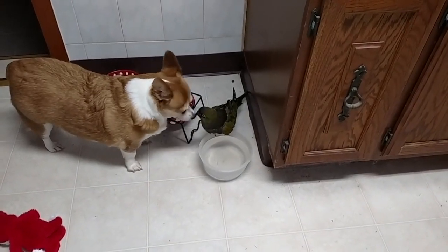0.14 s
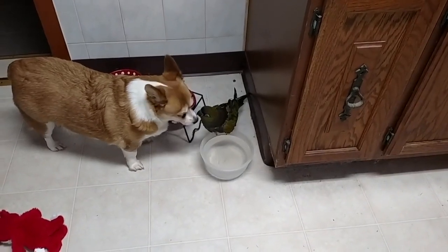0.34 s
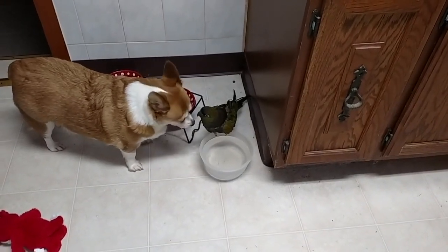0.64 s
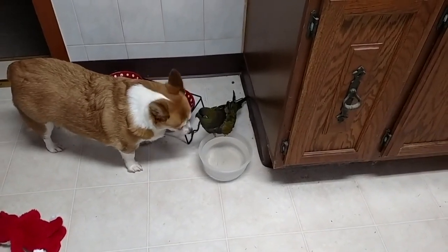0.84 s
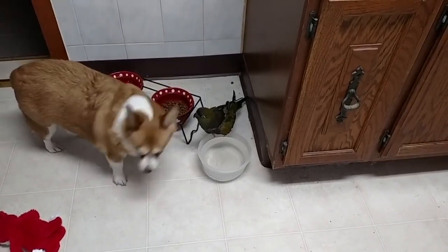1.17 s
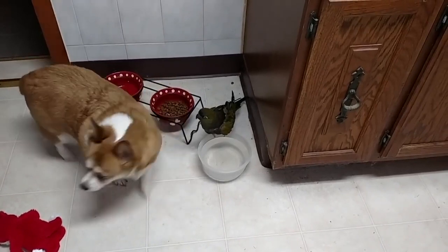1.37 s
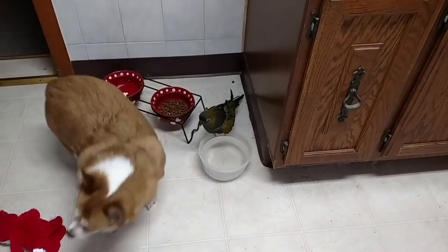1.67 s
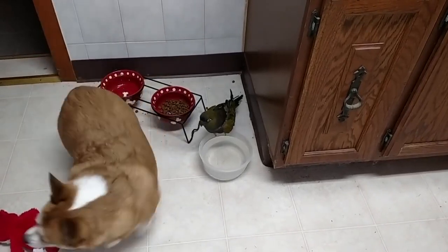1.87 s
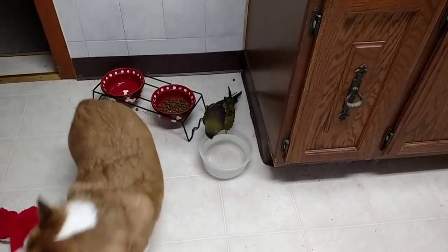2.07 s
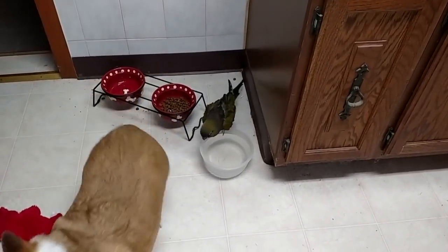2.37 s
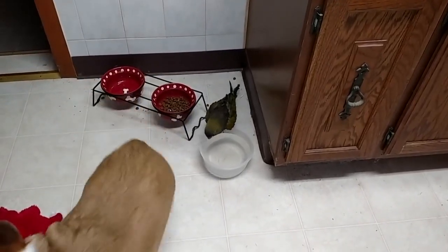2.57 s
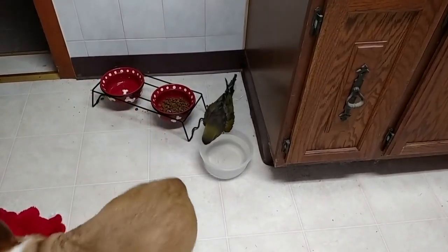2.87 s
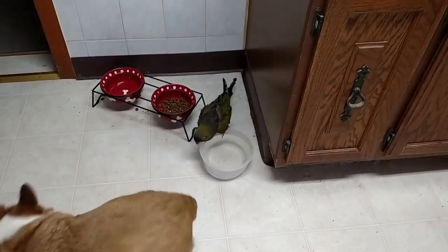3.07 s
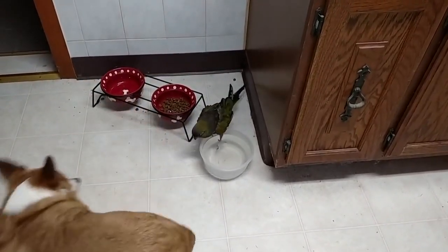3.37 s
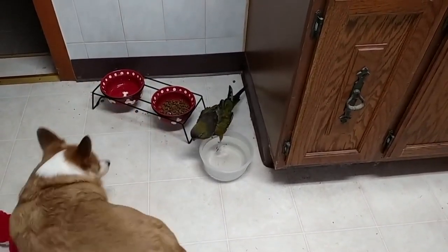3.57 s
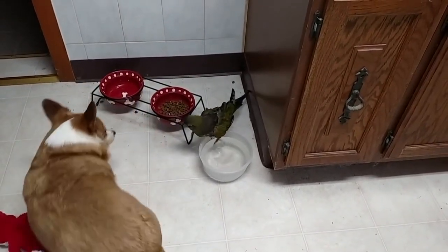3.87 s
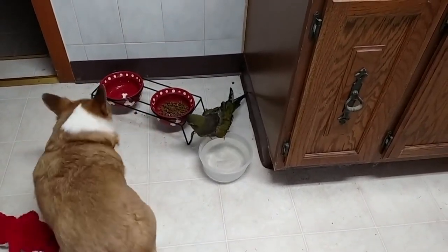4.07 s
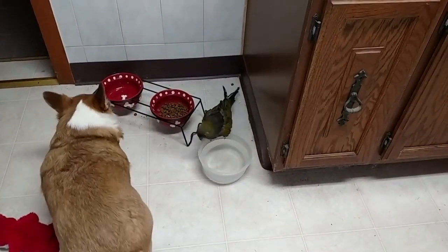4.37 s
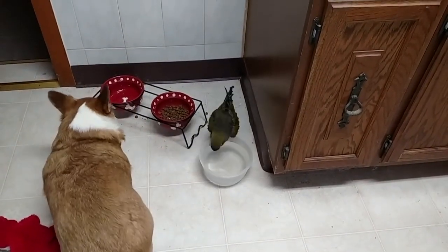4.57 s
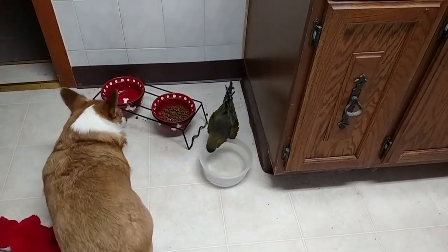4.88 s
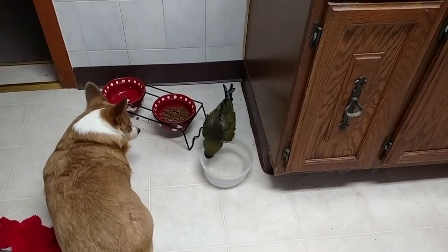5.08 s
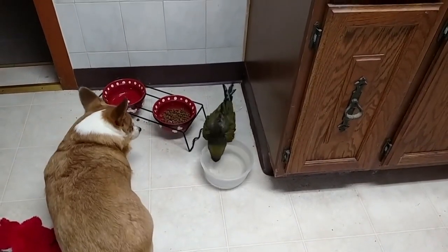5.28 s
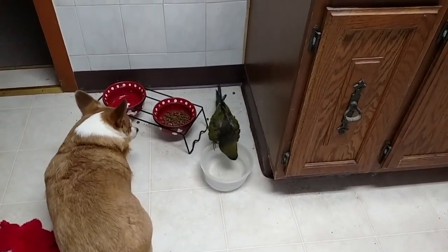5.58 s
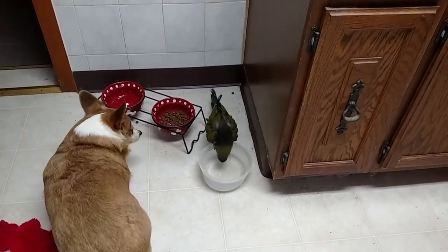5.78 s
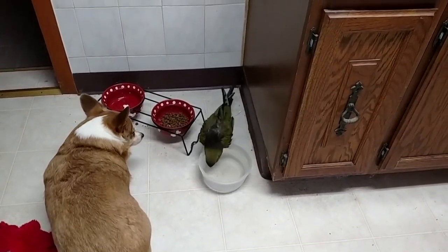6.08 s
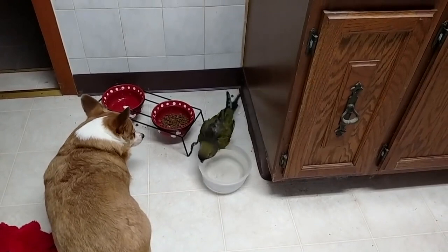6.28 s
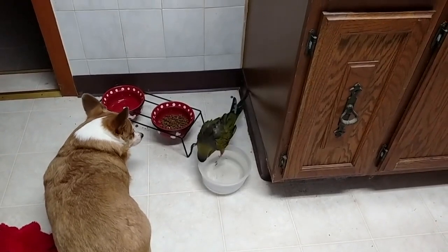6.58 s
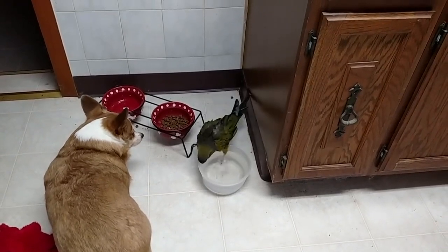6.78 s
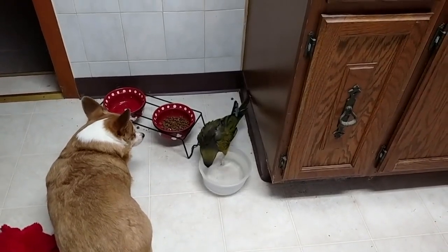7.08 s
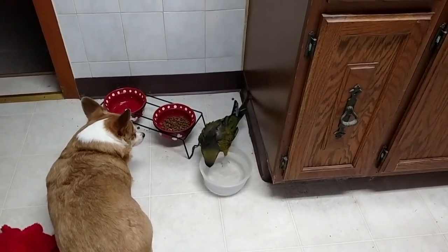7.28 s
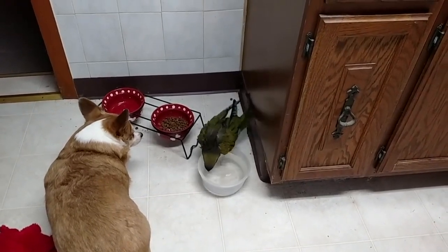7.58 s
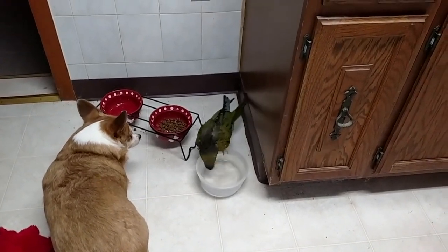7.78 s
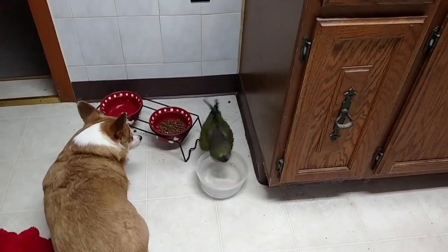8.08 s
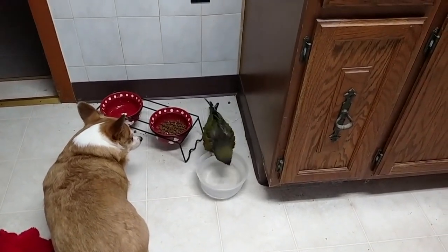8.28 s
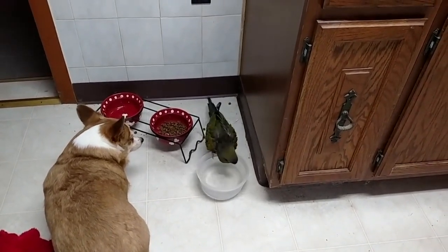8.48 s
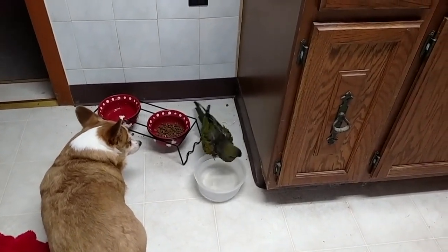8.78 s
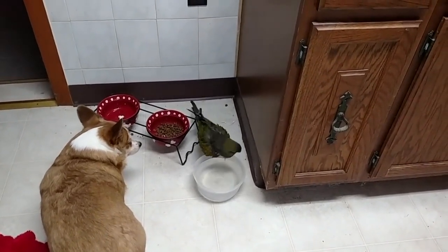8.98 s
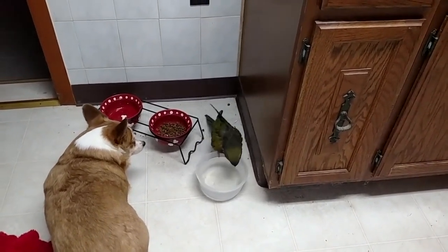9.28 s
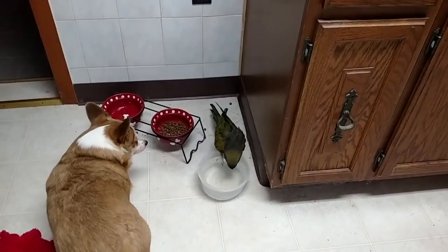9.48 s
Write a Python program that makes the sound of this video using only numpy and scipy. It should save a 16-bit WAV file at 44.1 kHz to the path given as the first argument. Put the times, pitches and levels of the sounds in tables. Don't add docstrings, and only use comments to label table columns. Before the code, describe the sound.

In a small tiled kitchen with a faint low fridge hum, a dog's nails tick and scuff across the floor, growing firmer before it stops. A small parrot gives four brief, loud, raspy squawks about two seconds apart. Between the second and third, a plastic bowl gets three quick knocks. Later there are only faint foot shifts and a tiny drip. One room microphone, short bright reflections.

```python
import sys
import numpy as np
from scipy import signal
from scipy.fft import rfft, irfft, next_fast_len
from scipy.io import wavfile
from scipy.ndimage import uniform_filter1d, map_coordinates

SR = 44100
rng = np.random.default_rng(int(sys.argv[2]) if len(sys.argv) > 2 else 0)


def elevation(decibels):
    levels = np.asarray(decibels, float)
    return 10 ** (levels / 20)


def persist_wave(psi):
    counts = np.round(np.clip(psi, -1, 1) * 32767).astype(np.int16)
    wavfile.write(sys.argv[1], SR, np.atleast_2d(counts).T)


N = 425124

# [f/Hz, t60/s]
ROOM_DECAY = [(500, .36), (2000, .34), (5000, .34), (12000, .29)]
# [delay t/s, level/dB]
REFLECTIONS = [
    (.0021, -16.5),
    (.0047, -11.5),
    (.0083, -14),
    (0.013, -9),
    (0.018, -19.5),
]

# [f/Hz, rms level/dB, unsteadiness/dB]
MOTOR_TONES = [(48.1, -76, 0.2), (86.8, -85.5, 3.5), (119, -80, 4.5), (151, -78, 3.5), (189.5, -68.5, 2.9),
               (238, -73.5, 2.5), (293, -70.5, 2.5), (328.6, -73, 5.5), (353.4, -73.5, 6), (455, -76, 2.5),
               (574, -82.5, 1), (723, -76, 3.5), (840, -79.5, 1.5), (3370, -92.5, 3.5)]
# [f/Hz, density level/dB]
FAN_RUSH = [(15, -49), (30, -12.5), (75, -17), (125, -8.5), (300, -6.5), (410, -11), (480, -8), (870, -13),
            (1250, -14), (1750, -18), (2060, -25), (3600, -29.5), (5000, -35), (15500, -47)]

# [t/s, peak level/dB, centre
# f/Hz]
NAIL_TICKS = [(1.1473, -51, 3660), (1.2744, -63.5, 2700), (1.3694, -56.5, 2330), (1.841, -56.5, 2890),
              (1.934, -50.5, 3720), (2.128, -60, 2704), (2.224, -56, 3860), (2.6347, -52, 2390),
              (2.6983, -55, 2790), (2.7746, -60, 2190), (2.824, -53.5, 3300), (2.977, -50.5, 2400),
              (3.086, -53.5, 2990), (3.2071, -51, 2700), (3.554, -46.5, 5220), (3.6094, -51, 3590),
              (3.675, -49, 4220), (3.845, -47, 3585),
              (4.8689, -57, 2488), (5.4056, -59, 2420), (6.3694, -52, 3390), (7.447, -59.5, 3540),
               (7.8464, -62, 2600), (8.0154, -54.5, 3740), (8.233, -50.5, 2310), (8.9522, -50, 4190),
               (9.0455, -59, 3870), (9.1272, -54, 3740), (9.3995, -55, 3595)]
# [t/s, peak level/dB, centre f/Hz, scuff length t/s]
SLIDING_NAILS = [(1.655, -48, 3300, 0.016), (1.725, -47, 2370, 0.016), (1.916, -54.5, 2586, 0.028),
                 (2.024, -54, 5000, .012), (2.237, -48.5, 2160, .017), (2.68, -56, 2570, 0.026),
                 (2.8589, -50, 2410, 0.01), (3.119, -56.5, 3970, .022), (3.335, -42.5, 3930, .022),
                 (3.7205, -48, 3600, .028), (3.7318, -42.5, 3840, 0.013)]
# [t/s, peak level/dB, centre f/Hz]
HARD_LANDINGS = [
    (2.9218, -41, 4020),
    (3.2779, -51, 2960),
    (3.3134, -51, 3910),
    (3.443, -37, 3700),
]
# [f/Hz, level/dB]
SKID_BANDS = [(2900, -5), (3800, -0.5)]

# [f/Hz, level/dB]
WINDPIPE = [(350, -41), (600, -9.5), (800, -5), (1250, -2), (1700, 3), (2200, 4.5), (2700, -5),
            (3200, -2.5), (3900, -2.5), (5300, -12), (6200, -20), (8000, -29.5), (10500, -43), (15500, -51)]
# [t/s, pitch f/Hz]
CALL_TUNES = [
    [(2.276, 600), (2.303, 1235), (2.332, 1295), (2.346, 1235), (2.355, 930), (2.37, 650), (2.395, 612),
     (2.416, 670), (2.446, 430)],
    [(3.927, 900), (3.945, 1235), (3.958, 1285), (3.978, 1320), (3.992, 1300), (3.998, 990), (4.013, 765),
     (4.059, 765), (4.145, 715)],
    [(5.889, 610), (5.908, 1030), (5.922, 1120), (5.96, 1170), (5.972, 1140), (5.982, 1015), (5.989, 820),
     (6.001, 780), (6.007, 585)],
    [(8.371, 750), (8.382, 1140), (8.392, 1230), (8.43, 1325), (8.445, 1240), (8.456, 940), (8.472, 790),
     (8.482, 765), (8.562, 710)],
]
# [t/s, effort level/dB, beak closing as resonance level/dB]
CALL_PUSHES = [
    [(2.276, -43, -2.5), (2.287, -24.5, 4.5), (2.31, -17.5, -10), (2.346, -23, -5.5), (2.372, -24, 5),
     (2.402, -33, -6), (2.418, -30.5, -6), (2.436, -29, 18), (2.446, -48, 6)],
    [(3.927, -54.5, 1.5), (3.935, -27.5, 1.5), (3.978, -19, 9), (3.994, -26, 3), (4.034, -19.5, 6.5),
     (4.052, -30.5, 8.5), (4.072, -26, 1.5), (4.108, -34.5, 18), (4.145, -51.5, 8)],
    [(5.877, -49, 3), (5.887, -27, -23), (5.908, -24.5, -3), (5.94, -23.5, -4.5), (5.963, -18.5, 0.5),
     (5.99, -20.5, 0), (6.006, -22.5, 1), (6.02, -23, 1), (6.027, -45, 4)],
    [(8.36, -43.5, -14), (8.371, -21.5, 8.5), (8.392, -18.5, -13.5), (8.43, -20.5, -3.5),
     (8.456, -23.5, 7.5), (8.5, -26, -2.5), (8.527, -27, 2), (8.553, -29, 6.5), (8.585, -53, -3)],
]
# [t/s, length t/s, pitch f/Hz]
VOICE_CRACKS = [
    (2.399, .014, 1225),
    (4.04, .015, 920),
    (6.011, .009, 1165),
    (8.493, .016, 1245),
]
CALL_RASPS = [
    (.06, .24, .2),
    (.14, .04, .42),
    (.08, .25, .35),
    (.07, .4, .5),
]
# [resonance f/Hz, room level/dB, brightness/dB per octave, lowest tone level/dB]
CALL_BEAKS = [
    (2160, -4.5, 3.5, 2.5),
    (2190, -0.5, 4.5, -1.5),
    (2331, -4, -1, 1),
    (2274, -5.5, 3.5, 5.5),
]
# [brightness/dB per octave, lowest tone level/dB]
SLACK_VOICE = [
    (3, 4.5),
    (0.5, 9.5),
    (-2.5, -6),
    (-0.5, 1.5),
]
# [f/Hz, depth level/dB]
FLOOR_NOTCHES = [
    (4450, -12),
    (4550, -8),
    (6300, -8),
    (4450, -5),
]

# [t/s, peak level/dB]
RIM_KNOCKS = [
    (4.2312, -27),
    (4.2505, -29),
    (4.2752, -27),
]
# [f/Hz, level/dB]
RIM = [(600, -16.5), (1430, 2.5), (1800, -6), (2200, 3.5), (3100, -5), (4300, 5), (5300, -7.5), (6800, -22),
       (9600, -17), (12000, -38), (15000, -30)]


def unit(x):
    return x / np.sqrt(np.mean(x ** 2) + 1e-20)


def along(points, hz):
    f, value = np.transpose(points)
    return np.interp(np.log(hz + 1), np.log(f + 1), value)


def wobble(rate, size):
    knots = rng.standard_normal(int(size * rate / SR) + 4)
    return map_coordinates(knots, [np.arange(size) * rate / SR])


def coloured(x, gain):
    m = next_fast_len(len(x) + 4096)
    return irfft(rfft(x, m) * gain(np.fft.rfftfreq(m, 1 / SR)), m)[:len(x)]


def add(track, s, x):
    part = track[round(s * SR):][:len(x)]
    part += x[:len(part)]


def kitchen(x, wet_db):
    hz, t, z = signal.stft(rng.standard_normal(SR // 2), SR, nperseg=256)
    decay = elevation(-60 * t / along(ROOM_DECAY, hz)[:, None])
    tail = signal.istft(z * decay, SR, nperseg=256)[1][:SR // 2]
    tail *= 1 - np.exp(-np.arange(len(tail)) / SR / .006)
    answer = elevation(wet_db) * tail / np.linalg.norm(tail)
    answer[0] = 1
    for s, db in REFLECTIONS:
        answer[round(s * SR)] += elevation(db + wet_db)
    return signal.fftconvolve(x, answer)


def fridge():
    t = np.arange(N) / SR
    tones = np.zeros(N)
    for hz, db, sway_db in MOTOR_TONES:
        level = elevation(db + 2.5 + sway_db * wobble(6.7, N))
        phase_drift = 0.26 * sway_db * wobble(3.5, N)
        tones += level * np.sin(2 * np.pi * hz * t + phase_drift)
    rush = unit(coloured(rng.standard_normal(N), lambda hz: elevation(along(FAN_RUSH, hz))))
    rush_db = -60 + 0.32 * wobble(1.5, N) + .5 * wobble(20, N)
    return tones + elevation(rush_db) * rush


def claw(db, centre_hz, scuff_s, scuff_share, edge_db):
    t = np.arange(SR // 8) / SR
    grit = rng.standard_normal(len(t)) * elevation(2.1 * wobble(740, len(t)))
    broad = [(500, -22), (1500, -3), (centre_hz, 0), (7000, -8), (10000, -24), (15000, -36)]
    nail = lambda hz: elevation(along(broad, hz) + 3.6 / (1 + ((hz - centre_hz) / 500) ** 2))
    landing = np.exp(-t / 0.00087)
    slide = scuff_share * (t / scuff_s) * np.exp(1 - t / scuff_s * 2)
    edge = elevation(edge_db) * np.diff(rng.standard_normal(len(t) + 1))
    contact = (landing + slide) * (unit(coloured(grit, nail)) + edge)
    return kitchen(elevation(db - 5) * contact, wet_db=-5)


def claws():
    track = np.zeros(N)
    tick_scuff_s, tick_share, slide_share = 0.0082, 0.6, 1.08
    soft_edge_db, hard_edge_db = -23, -15.5
    for s, db, centre_hz in NAIL_TICKS:
        add(track, s, claw(db, centre_hz, tick_scuff_s, tick_share, soft_edge_db))
    for s, db, centre_hz in HARD_LANDINGS:
        add(track, s, claw(db, centre_hz, tick_scuff_s, tick_share, hard_edge_db))
    for s, db, centre_hz, scuff_s in SLIDING_NAILS:
        add(track, s, claw(db, centre_hz, scuff_s, slide_share, soft_edge_db))
    return track


def squeak():
    start_s, length_s, level_db = 2.018, 0.022, -59.5
    track, t = np.zeros(N), np.arange(0, length_s, 1 / SR)
    bands = lambda hz: sum(elevation(db) / (1 + ((hz - centre_hz) / 120) ** 2) for centre_hz, db in SKID_BANDS)
    swell = np.sqrt(np.abs(np.sin(np.pi * t / length_s)))
    skid = unit(coloured(rng.standard_normal(len(t)), bands)) * swell
    add(track, start_s, kitchen(elevation(level_db) * skid, wet_db=-7.5))
    return track


def squawk(tune, crack, rasps, push, beak_hz, bright_db, lowest_db, slack_bright_db, slack_lowest_db):
    t = np.arange(push[0][0], push[-1][0], 1 / SR)

    def read(points):
        columns = np.transpose(points)
        return [uniform_filter1d(np.interp(t, columns[0], c), size=130) for c in columns[1:]]

    pitch_hz, = read(tune)
    effort_db, beak_db = read(push)

    slack = np.interp(pitch_hz / pitch_hz.max(), [.6, .95], [1, 0])
    rasp = rasps[0] + slack * np.interp(t, [t.mean(), t.max()], rasps[1:])
    opening = np.exp(-(t - t.min()) / 0.019)
    bright_db = bright_db + slack_bright_db * slack - 4 * opening
    lowest_db = lowest_db + slack_lowest_db * slack

    crack_s, crack_length, crack_hz = crack
    cracked = 1. * (t > crack_s) * (t < crack_s + crack_length)
    pitch_hz = pitch_hz + uniform_filter1d(cracked, size=220) * (crack_hz - pitch_hz)
    glide = np.abs(np.gradient(np.log2(pitch_hz))) * SR
    gliding = np.minimum(glide / 36, 1)
    pitch_hz = pitch_hz * (1 + .007 * wobble(300, len(t)) + .04 * rasp * wobble(260, len(t)))
    phase = 2 * np.pi * np.cumsum(pitch_hz) / SR

    k = np.arange(1, 21)[:, None]
    hz = k * pitch_hz
    beak = beak_db / (1 + ((hz - beak_hz) / 300) ** 2)
    size_db = along(WINDPIPE, hz) + bright_db * np.log2(hz / 2200) + beak + lowest_db * (k == 1)
    size_db -= (.8 + 6 * rasp) * np.maximum(k - 4, 0)
    size_db -= 4 * gliding * np.clip(k - 3, 0, 3)
    size = elevation(size_db) * (hz < SR / 2.5)
    shimmer = elevation((.2 + .5 * np.minimum(k, 8)) * np.array([wobble(250, len(t)) for _ in k]))
    voice = np.sum(size * shimmer * np.sin(k * phase), 0) / np.sqrt(np.sum(size ** 2, 0) / 2)

    flutter = elevation(.8 * wobble(200, len(t)) + 3 * rasp * wobble(230, len(t)))
    beat = np.cumsum(140 + 35 * wobble(60, len(t))) / SR
    flutter *= 1 + np.minimum(1.3 * rasp, .8) * np.sin(2 * np.pi * beat)

    gate = (1 + np.cos(phase)) ** 2
    airway = lambda hz: elevation(along(WINDPIPE, hz) + 4.4 * np.log2(hz / 2200 + .1))
    breath = unit(coloured(gate * rng.standard_normal(len(t)), airway))
    breath *= .09 + .45 * rasp
    edges = 1 - np.exp(-np.minimum(t - t.min(), t.max() - t) / .002)
    call = elevation(effort_db) * edges * (flutter * voice + np.sqrt(flutter) * breath)
    deepest_hz = .88 * min(row[1] for row in tune)
    return coloured(call, lambda hz: 1 / (1 + (deepest_hz / (hz + 1)) ** 12))


def parrot():
    track = np.zeros(N)
    calls = zip(CALL_TUNES, VOICE_CRACKS, CALL_RASPS, CALL_PUSHES, CALL_BEAKS, SLACK_VOICE, FLOOR_NOTCHES)
    for tune, crack, rasps, push, (beak_hz, wet_db, *clear), slack, (notch_hz, notch_db) in calls:
        call = squawk(tune, crack, rasps, push, beak_hz, *clear, *slack)
        call = coloured(call, lambda hz: elevation(notch_db / (1 + ((hz - notch_hz) / 300) ** 2)))
        add(track, push[0][0], kitchen(call, wet_db))
    return track


def bowl():
    track, t = np.zeros(N), np.arange(SR // 10) / SR
    for s, db in RIM_KNOCKS:
        rim = unit(coloured(rng.standard_normal(len(t)), lambda hz: elevation(along(RIM, hz))))
        crack = np.exp(-t / .0018)
        rattle = .33 * elevation(-60 * t / .16 + 3 * wobble(500, len(t)))
        add(track, s, kitchen(elevation(db - 8) * (crack + rattle) * rim, wet_db=-6.5))
    return track


def drip():
    start_s, level_db, start_hz, rise_per_s, life_s = 7.839, -66, 1650, 25, .012
    track, t = np.zeros(N), np.arange(SR // 20) / SR
    swell = (t / life_s) * np.exp(1 - (t / life_s) ** 2)
    bubble = np.sin(2 * np.pi * start_hz * (t + rise_per_s * t ** 2 / 2)) * swell
    add(track, start_s, kitchen(elevation(level_db) * bubble, wet_db=-8))
    return track


def scene():
    return (fridge() + claws() + squeak() + parrot() + bowl() + drip())[None]


def roll_off(x):
    return signal.sosfilt(signal.butter(12, 15750, fs=SR, output="sos"), x)


def record(dry):
    end_s = 9.605
    fade = elevation(np.interp(np.arange(N) / SR, [end_s, end_s + 0.0052], [0, -9]))
    heard = coloured(dry[0] * fade, lambda hz: hz < 15600)
    return roll_off(heard[None])


dry = scene()
out = record(dry)
persist_wave(out)
```